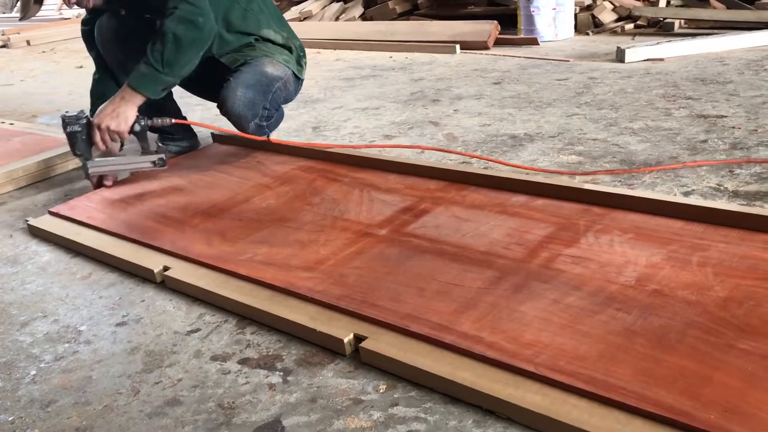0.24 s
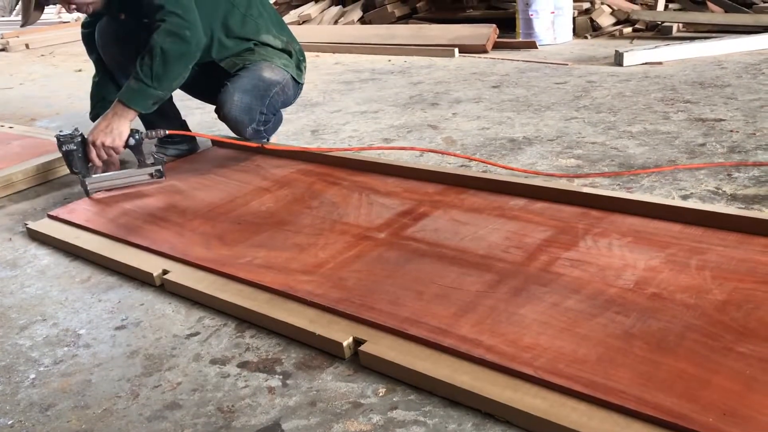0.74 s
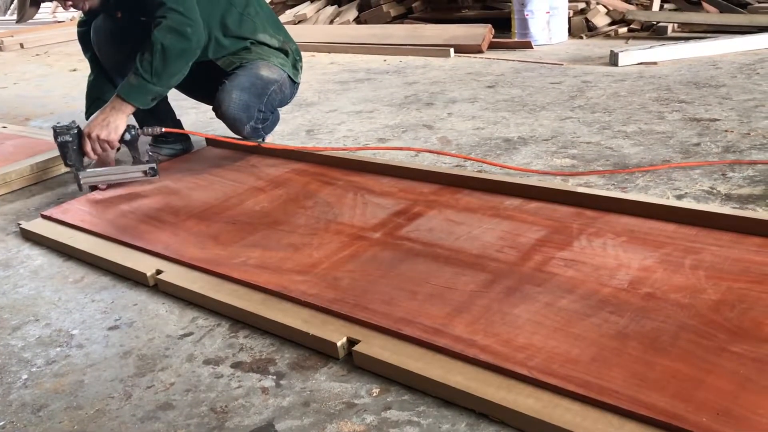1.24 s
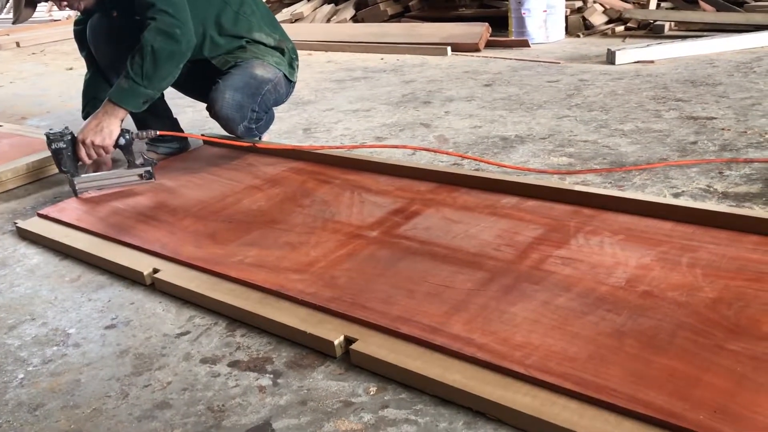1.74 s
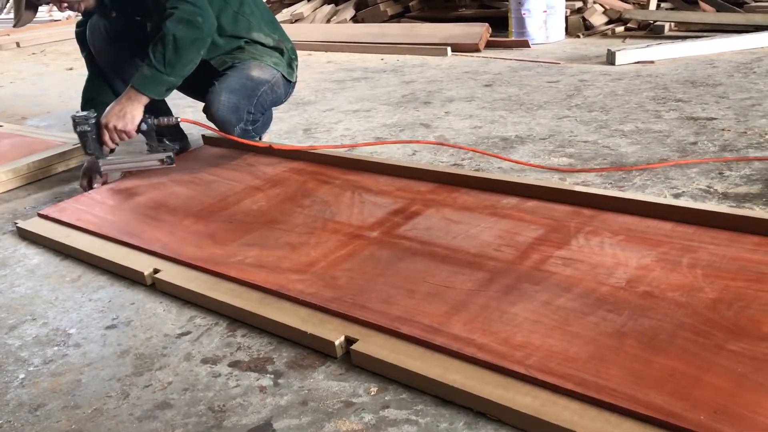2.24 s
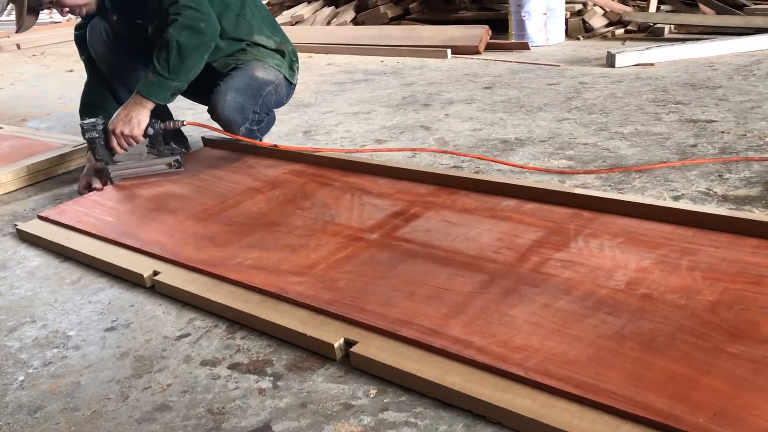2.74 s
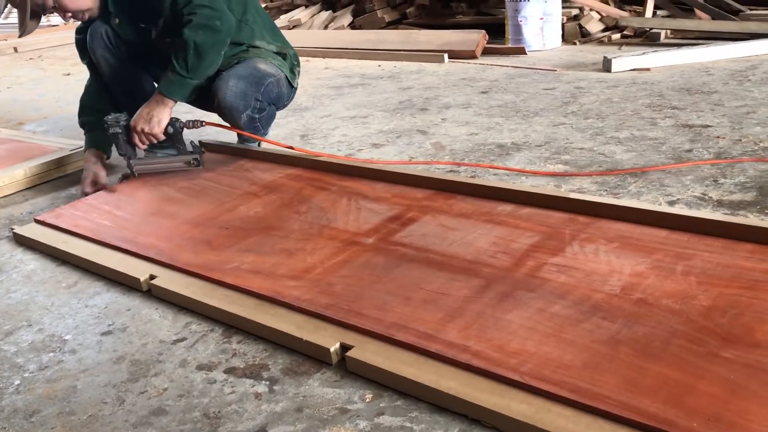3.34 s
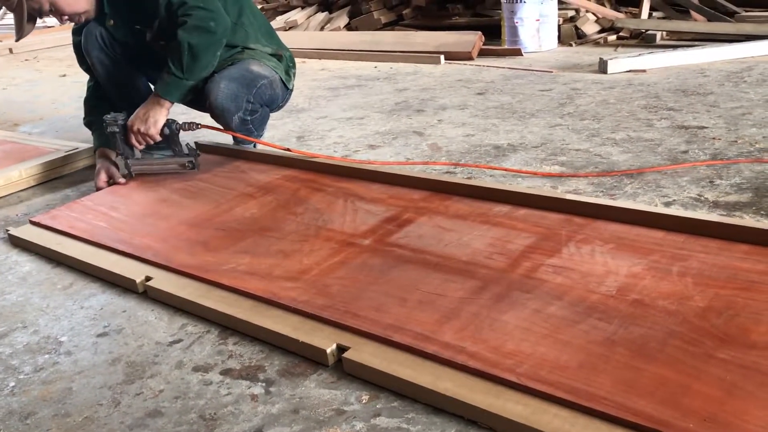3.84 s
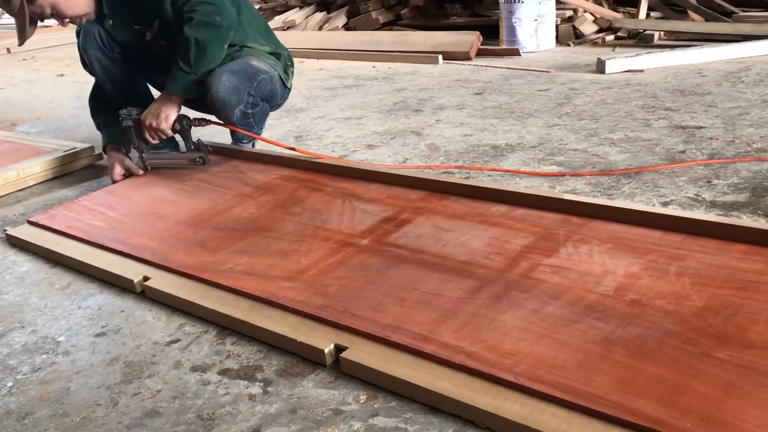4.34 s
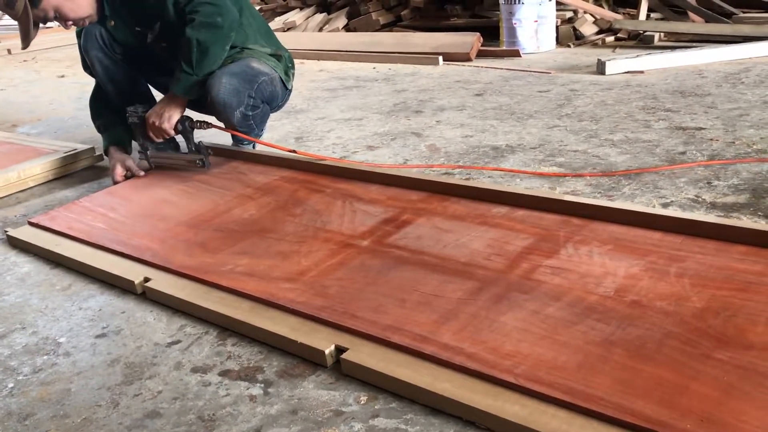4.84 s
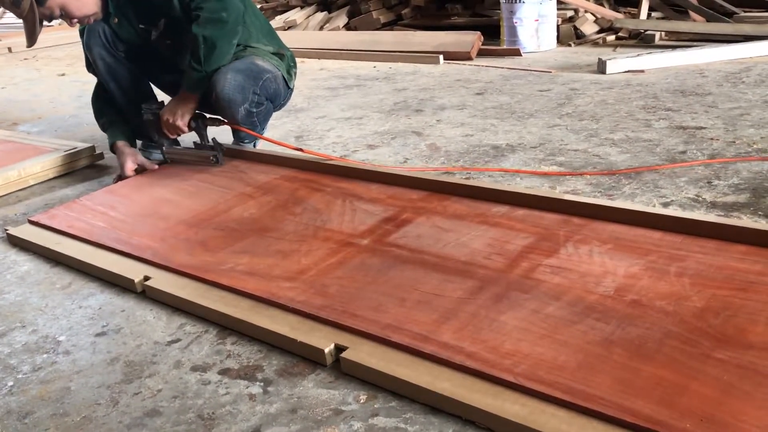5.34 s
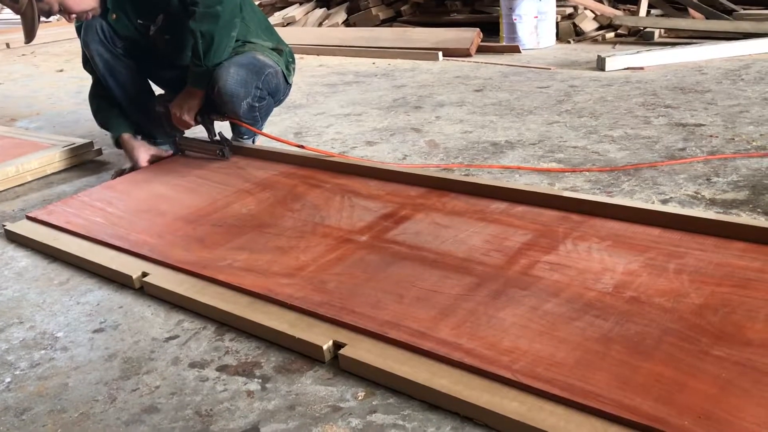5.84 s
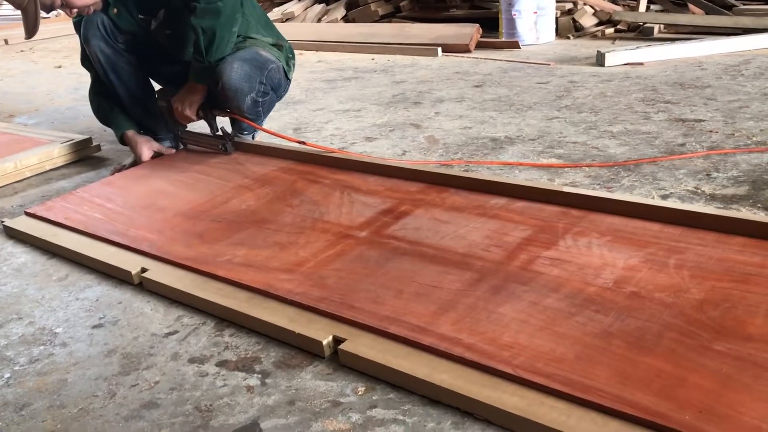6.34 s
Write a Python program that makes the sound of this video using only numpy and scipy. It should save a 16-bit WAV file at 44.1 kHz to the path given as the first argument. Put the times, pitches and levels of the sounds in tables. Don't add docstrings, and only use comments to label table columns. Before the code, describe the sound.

A nailer fires seven sharp double-hit shots with short hisses, its nose knocking a hollow panel while a distant engine throbs faintly.

```python
import sys
import numpy as np
from scipy import signal
from scipy.fft import rfft, irfft
from scipy.io import wavfile
from scipy.ndimage import uniform_filter1d

SR = 44100
rng = np.random.default_rng(int(sys.argv[2]) if len(sys.argv) > 2 else 0)


def invert_db(x):
    u = np.asarray(x, float) / 20
    return 10 ** u


def store_pcm(level_fs):
    pcm = np.round(np.clip(level_fs, -1, 1) * 32767).astype(np.int16)
    wavfile.write(sys.argv[1], SR, np.atleast_2d(pcm).T)


N = 291060
T = np.arange(N) / SR

# freq_hz, density_db (per Hz)
YARD_COLOUR = [(15, -58), (25, -14), (48, -13), (87, -9), (111, -7.5), (226, -18), (339, -24), (496, -30),
               (766, -42.5), (1470, -31), (1880, -37), (15200, -67), (16500, -69)]
# time_s, activity_db
YARD_ACTIVITY = [(0, -4), (1, 2.5), (1.6, -0.5), (2.2, -4.5), (3.3, -14.5), (4.3, -6.5), (5.25, -25),
                 (6.1, -23.5), (6.6, -6.5)]
# freq_hz, density_db (per Hz)
SAW_COLOUR = [(1200, -19), (2200, 2), (3200, -2), (4500, -4.5), (6000, -17.5), (9000, -22.5),
              (12000, -13.5), (16000, -25)]
# time_s, level_db (rms), favoured_hz
ENGINE_GAP = [(0, -52, 96), (.3, -45.5, 122), (.8, -45, 142), (1.0, -39, 136), (1.35, -38, 126),
              (1.62, -44.5, 100), (2.1, -42, 122), (2.3, -37, 116), (2.45, -38, 106), (3.1, -43.5, 94),
              (3.95, -47.5, 112), (4.3, -57, 130), (4.9, -48, 108), (5.2, -49.5, 114), (5.85, -50.5, 112),
              (6.08, -46, 100), (6.6, -46.5, 112)]
# order (multiple of the cycle), level_db
ENGINE_ORDERS = [(3, -56.5), (4, -61.5), (10, -61), (13, -55.5), (14, -64.5), (15, -55.5), (17, -56),
                 (18, -54.5), (20, -69)]
# start_s, low_modes_db, hardness_db
NOSE_TAPS = [
    (.075, -12.5, -3.5),
    (1.189, -11, -0.5),
    (1.452, -13, -4),
    (3.391, -12.5, -3.5),
    (4.073, -11.5, 1.5),
    (5.024, -24.5, -1.5),
    (6.017, -25.5, -7.5),
]
# pitch_hz, level_db, t60_s
PANEL_MODES = [(157, 4, 0.6), (174, 2, .09), (189, 5, .16), (218.4, 2, 0.18), (270.4, 1, 0.19),
               (288.5, -6, 0.32), (363, -6, 0.17), (425.5, -9.5, 0.083), (468.4, -9, 0.15), (540, -8, 0.14),
               (640, -16, 0.09), (820, -16.5, .07), (890, -15, 0.049)]
# freq_hz, density_db (per Hz)
WOOD_COLOUR = [(200, -12.5), (500, 8), (1200, 2.5), (2200, -6.5), (3500, -15), (6000, -42), (16000, -52)]
# start_s, length_s, level_db (rms)
SQUEAL_GRIPS = [
    (.122, 0.07, -48.5),
    (.2, 0.05, -44),
    (0.248, .02, -47),
    (0.271, 0.034, -46),
    (0.311, 0.019, -45),
    (0.347, .021, -47),
    (0.375, 0.017, -48),
    (.396, 0.04, -51.5),
]
# start_s, peak_db, seep_before_db
VALVE_OPENS = [
    (0.4251, -9.5, -50),
    (1.7499, -5.5, -45),
    (2.5125, -7, -39),
    (3.5728, -8, -37),
    (4.3885, -8, -46),
    (5.3206, -9, -62.5),
    (6.1512, -6, -41),
]
# start_s, length_s, level_db (rms)
TRIGGER_LEAKS = [
    (1.616, 0.033, -40.5),
    (1.73, 0.016, -38),
]
# freq_hz, density_db (per Hz)
JET_COLOUR = [(180, -59.5), (300, -23.5), (1600, -9), (2480, -13.5), (4240, -4.5), (5100, -10),
              (6780, -6.5), (9330, -7.5), (14400, -1), (15700, -3), (16500, -30)]
# freq_hz, density_db (per Hz)
BURST_COLOUR = [(180, -39), (300, -7), (938, -8), (2890, -9.5), (5640, -9.5), (6240, -11.5), (9810, -7),
                (11400, -8), (14400, 1), (15700, -5), (16500, -16.5)]
# start_s, peak_db, panel_thump_db, ping_db
DRIVER_BLOWS = [
    (0.445, -2, -3.5, -24),
    (1.787, -3.5, -5, -10.5),
    (2.5369, -3.5, -5.5, -1.5),
    (3.5991, -2.5, -6, 0),
    (4.413, -3, -7.5, 0.5),
    (5.343, -4, -9.5, -0.5),
    (6.178, -3.5, -7, -21),
]
# pitch_hz, width_hz, level_db, enters_after_s
GUN_BODY = [(900, 800, -20, 0.015), (1510, 350, 3.5, 0.0018), (2337, 130, -2.5, 0.00033),
            (3210, 610, 4.5, .0002), (4340, 270, -9, 0.00016), (5500, 900, -14.5, 0.00016)]
# start_s, peak_db, piston_knock_db, mic_puff_db
EXHAUSTS = [
    (0.5862, -6.5, -5, -17),
    (1.8805, -8, -6.5, -28.5),
    (2.6564, -9.5, -7, -35),
    (3.7098, -9, -6.5, -17),
    (4.5586, -8, -10, -18.5),
    (5.5191, -7.5, -19, -14.5),
    (6.328, -7.5, -11, -15.5),
]
# pitch_hz, level_db, t60_s
PISTON_KNOCK = [(960, 1, 0.016), (1075, 8, 0.021), (1363, -2, 0.0073), (1700, -4, 0.015), (2700, -4, 0.015),
                (3600, -8, 0.014), (5600, -9, .012)]
# freq_hz, t60_s, level_db
SHED_TAIL = [(194.8, 0.65, -8), (402, 0.83, -21), (880, 1.27, -22.5), (1380, 1.137, -14.5),
             (3420, 0.99, -20), (5760, 0.95, -19), (11700, 0.59, -22.5)]
# pitch_hz, width_hz, level_db
TAIL_RESONANCES = [(1090, 170, 0), (1630, 380, 0), (3470, 78, -8), (4350, 84, -9), (5580, 99, -9),
                   (5970, 59, -10)]

BEND_S = 0.016
RATTLE_S, BURST_S = 0.013, 0.022


def noise(spectrum):
    hz, db = np.transpose(spectrum)
    f = np.arange(N // 2 + 1) * SR / N + 1
    colour = invert_db(np.interp(np.log(f), np.log(hz), db))
    x = irfft(rfft(rng.standard_normal(N)) * colour, N)
    return x / x.std()


WOOD_NOISE = noise(WOOD_COLOUR)


def walk(rate):
    k = int(SR / rate)
    steps = np.repeat(rng.standard_normal(N // k + 1), k)
    x = uniform_filter1d(uniform_filter1d(steps, k), k)[:N]
    return x / x.std()


def gate(start, end, rise, fall):
    return np.clip((T - start) / rise, 0, 1) * np.exp(-np.clip(T - end, 0, None) / fall)


def filtered(x, hz, kind="low"):
    return signal.sosfilt(signal.butter(2, hz, kind, fs=SR, output="sos"), x)


def ring(modes, scatter_db, detune=0.018):
    hz, db, t60 = np.transpose(modes)[:, :, None]
    chance = rng.standard_normal((2, len(modes), 1))
    t = T[:SR // 2]
    tones = np.sin(2 * np.pi * hz * (1 + detune * chance[1]) * t)
    x = (invert_db(db + scatter_db * chance[0]) * tones * 1000.0 ** (-t / t60)).sum(axis=0)
    return x / np.abs(x).max()


def add(out, s, x):
    i = int(s * SR)
    out[i:i + len(x)] += x[:N - i]


def yard():
    busy_db = np.interp(T, *np.transpose(YARD_ACTIVITY))
    bed = noise(YARD_COLOUR)
    saw = invert_db(-62 + 0.86 * busy_db) * noise(SAW_COLOUR)
    hiss = invert_db(-41.5 + 1.05 * busy_db) * filtered(bed, 450, "high")
    rumble = invert_db(-42.5 + 0.19 * busy_db + 1.2 * walk(2.2)) * filtered(bed, 450)
    return rumble - hiss + saw


def engine():
    s, level_db, favoured_hz = np.transpose(ENGINE_GAP)
    level_db, favoured_hz = np.interp(T, s, level_db), np.interp(T, s, favoured_hz)
    busy_db = np.interp(T, *np.transpose(YARD_ACTIVITY))
    hz = 19.4 - 0.092 * T
    cycle = 2 * np.pi * np.cumsum(hz) / SR
    out = np.zeros(N)
    for k in range(4, 9):
        favour = 1 / (1 + ((k * hz - favoured_hz) / 16) ** 2)
        out += invert_db(level_db + 0.61 * walk(8.5)) * favour * np.cos(k * cycle)
    for k, db in ENGINE_ORDERS:
        swell_db = 0.4 * (level_db + 36.5) + 0.6 * busy_db + 4 * walk(3.3)
        out += invert_db(db + swell_db) * np.cos(int(round(k)) * cycle)
    return np.sqrt(2) * out


def bend(x, lag):
    size = len(x) + SR // 10
    f = np.arange(size // 2 + 1) * SR / size
    travel = np.exp(-2j * np.pi * (2 * lag * np.sqrt(200 * f) - lag * f / 4))
    radiate = 1 / (1 + (135 / (f + 1)) ** 8)
    return irfft(rfft(x, size) * travel * radiate, size)[:len(x)] * np.linspace(1, 0, len(x))


def board(modes_db, tick_db, body_db, lag, tilt_db):
    t = T[:SR // 2]
    wood = np.roll(WOOD_NOISE, rng.integers(N))[:len(t)]
    dull = filtered(wood, 1700)
    body = (0.7 * wood + 3.5 * np.gradient(dull)) * np.exp(-t / 0.016) + 0.75 * dull * np.exp(-t / 0.03)
    tilted = [(hz, db + tilt_db * np.log2(hz / 200), t60) for hz, db, t60 in PANEL_MODES]
    modes = ring(tilted, 1.5, 0.006) * (1 - np.exp(-t / 0.0015))
    tick = (wood + 2.5 * np.gradient(wood)) * np.exp(-t / 0.003)
    out = bend(invert_db(modes_db) * modes + invert_db(body_db) * body, lag)
    out += bend(invert_db(tick_db) * tick, 0.403 * lag)
    back = int(0.017 * SR)
    out[back:] += invert_db(modes_db - 7) * bend(modes, 1.2 * lag)[:-back]
    return out


def taps():
    out = np.zeros(N)
    for s, db, hard_db in NOSE_TAPS:
        add(out, s, board(db, db - 14 + hard_db, db - 20 + 0.82 * hard_db, 0.64 * BEND_S, 0.7))
        db = db - 10.5
        add(out, s + 0.026, board(db - 0.5, db - 14 + hard_db, db - 20 + hard_db, 0.7 * BEND_S, 0.6))
    return out


def squeal():
    hz = 1585 - 110 * T + 6 * walk(33)
    phase = 2 * np.pi * np.cumsum(hz) / SR
    tone = np.sin(phase + 0.6 * walk(60)) + 0.06 * np.cos(2 * phase)
    grip = sum(invert_db(db) * gate(s, s + length - 0.004, 0.011, 0.007) for s, length, db in SQUEAL_GRIPS)
    return np.sqrt(2) * grip * tone * invert_db(2.6 * walk(72))


def air():
    jet, seep, burst = np.zeros(N), np.zeros(N), np.zeros(N)
    for (s, db, seep_db), blow in zip(VALVE_OPENS, DRIVER_BLOWS):
        until_blow = gate(0, blow[0] - 0.001, 0.001, 0.006)
        jet += invert_db(db - 11.5) * gate(s, s + 0.0056, 0.003, 0.032) * until_blow
        seep += invert_db(seep_db) * gate(s - 0.0063, s, 0.017, 0.002)
    for s, length, db in TRIGGER_LEAKS:
        seep += invert_db(db) * gate(s, s + length, 0.006, 0.003)
    for s, db, _, _ in EXHAUSTS:
        seep += invert_db(db - 22) * gate(s - 0.045, s, 0.035, 0.003)
        puff = gate(s - 0.001, s + BURST_S - 0.005, 0.0022, 0.0037)
        burst += invert_db(db - 8) * puff * (1 + 0.5 * gate(s, s, 0.001, 0.0042))
    gas = noise(JET_COLOUR)
    thin = filtered(gas, 5200, "high")
    return (jet * gas + seep * thin + burst * noise(BURST_COLOUR)) * invert_db(2 * walk(500))


def blows():
    out, scrape, t = np.zeros(N), noise(BURST_COLOUR), T[:SR // 10]
    for s, db, thump_db, ping_db in DRIVER_BLOWS:
        ping = np.sin(2 * np.pi * 3300 * t) * (t / 0.0021 * np.exp(1 - t / 0.0014)) ** 2
        add(out, s, invert_db(ping_db) * ping)
        for hz, width, mode_db, late in GUN_BODY:
            hits = rng.standard_normal(len(t)) * np.clip((t - late) / 0.00025, 0, 1)
            hits *= np.exp(-np.clip(t - late - RATTLE_S, 0, 1) / 0.0075)
            hits *= invert_db(2.2 * uniform_filter1d(rng.standard_normal(len(t)), size=60) * 8.3)
            body = np.gradient(np.sin(2 * np.pi * hz * t) * np.exp(-np.pi * width * t))
            rattle = signal.fftconvolve(hits, body)
            rattle /= rattle[:int((late + RATTLE_S) * SR)].std()
            add(out, s, invert_db(db + mode_db - 16.5) * rattle)
        slide = gate(s, s + RATTLE_S, 0.0011, 0.005) + 4.5 * gate(s + 0.001, s + 0.001, 0.0003, 0.001)
        out += invert_db(db - 35) * scrape * slide
        add(out, s + 0.004, board(thump_db, thump_db - 10, thump_db - 15, 0.98 * BEND_S, -3))
    return out


def knocks():
    out = np.zeros(N)
    puff_modes = [(59, -3, 0.048), (112, -2.5, 0.019), (197, -7.5, 0.16)]  # pitch_hz, level_db, t60_s
    for s, _, knock_db, puff_db in EXHAUSTS:
        landing = ring(PISTON_KNOCK, 2.4, 0.03) * (1 - np.exp(-T[:SR // 2] / 0.0012)) * 1.6
        add(out, s + BURST_S - 0.007, invert_db(knock_db) * landing)
        add(out, s + BURST_S - 0.0035, invert_db(knock_db - 10.5) * ring(PISTON_KNOCK, 2))
        add(out, s + 0.0048, invert_db(puff_db) * ring(puff_modes, 9.3, 0.2))
    return out


def shed(x):
    step = 44
    t = np.arange(1500) * step / SR
    far_wall = 0.5 * np.exp(-((t - 0.082) / 0.014) ** 2)
    build = (1 - np.exp(-t / 0.0044) + far_wall) ** 2
    octaves = np.log2(np.arange(N // 2 + 1) * SR / N + 1)
    source, field, out = rfft(x), rfft(rng.standard_normal(N)), 0
    field = field * (1 + sum(0.7 / (1 + ((2 ** octaves - f) / w) ** 2) for f, w, _ in TAIL_RESONANCES))
    hz, t60, db = np.transpose(SHED_TAIL)
    for centre in np.arange(7.5, 14.4, 1 / 3):
        band = np.cos(np.pi * np.clip(1.5 * (octaves - centre), -0.5, 0.5))
        energy = (irfft(source * band, N) ** 2).reshape(-1, step).mean(axis=1)
        decay = build * 1000.0 ** (-2 * t / np.interp(centre, np.log2(hz), t60))
        late = np.sqrt(np.convolve(energy, decay)[:len(energy)])
        late *= invert_db(6 * uniform_filter1d(rng.standard_normal(len(late)), size=25))
        hiss = irfft(field * band, N)
        level = invert_db(np.interp(centre, np.log2(hz), db) - 10.5)
        out = out + level * np.interp(T, T[::step], late) * hiss / hiss.std()
    return out


def scene():
    far = yard() + engine() + squeal()
    touch, hiss, strike = taps(), air(), blows() + knocks()
    wet = shed(invert_db(-0.5) * hiss + invert_db(-4) * strike + invert_db(-2.5) * touch)
    return (hiss + strike + touch + wet + far)[None]


def band_limit(x):
    return signal.sosfilt(signal.butter(12, 16990, fs=SR, output="sos"), x)


def record(dry):
    mic = filtered(dry, 70, "high")
    mic = mic + invert_db(-80.5) * np.diff(rng.standard_normal(N + 1))
    soft = np.tanh(0.91 * mic) / 0.98
    cut = signal.sosfilt(signal.ellip(8, 0.2, 60, 15900, fs=SR, output="sos"), soft)
    return band_limit(cut)


dry = scene()
out = record(dry)
store_pcm(out)
```